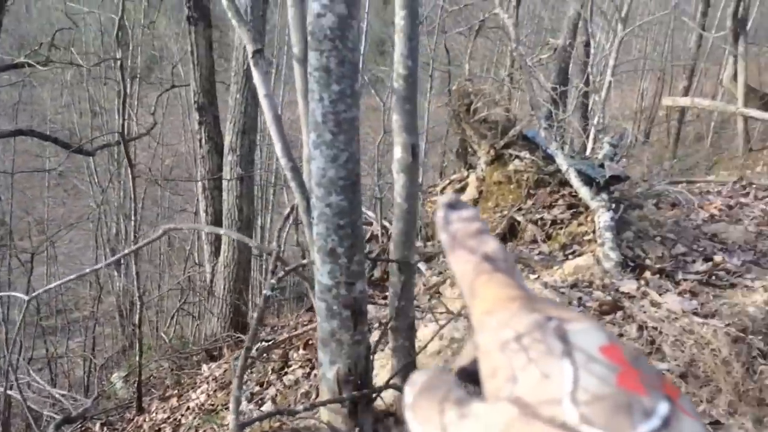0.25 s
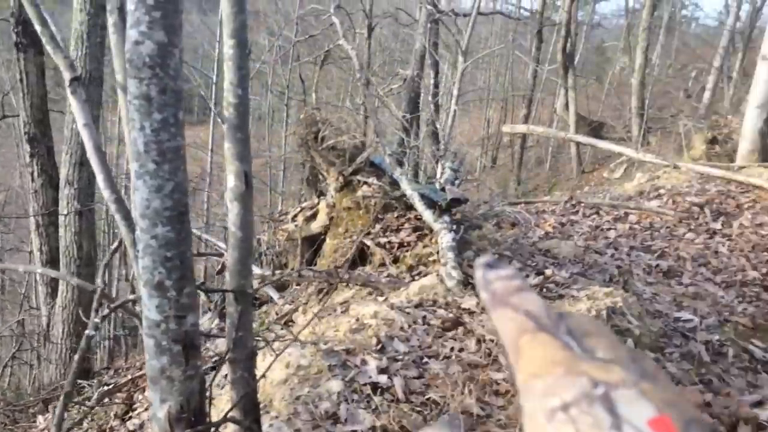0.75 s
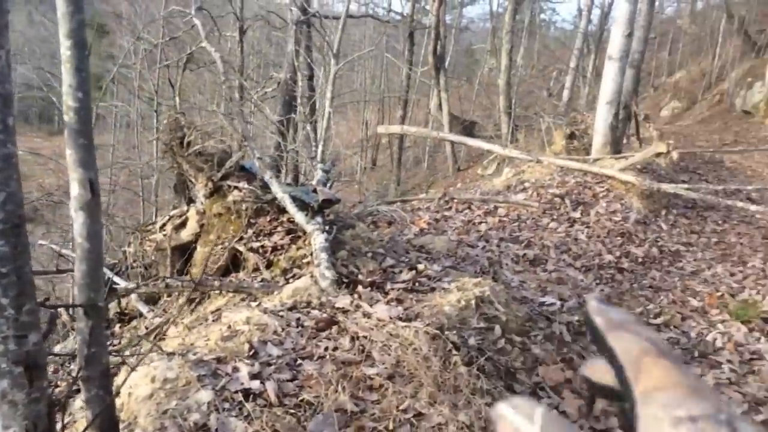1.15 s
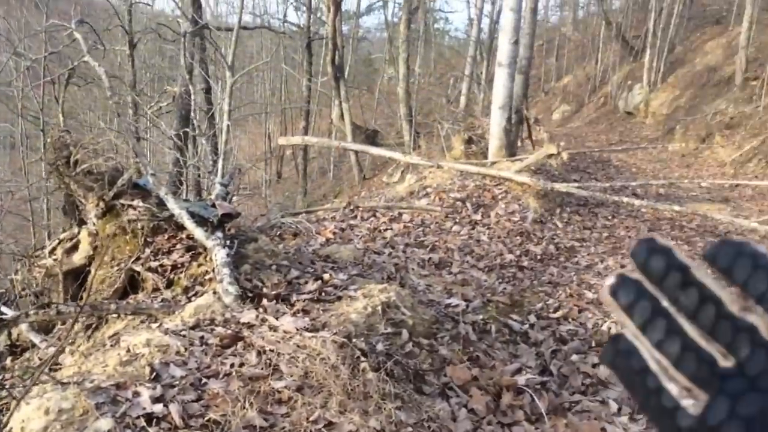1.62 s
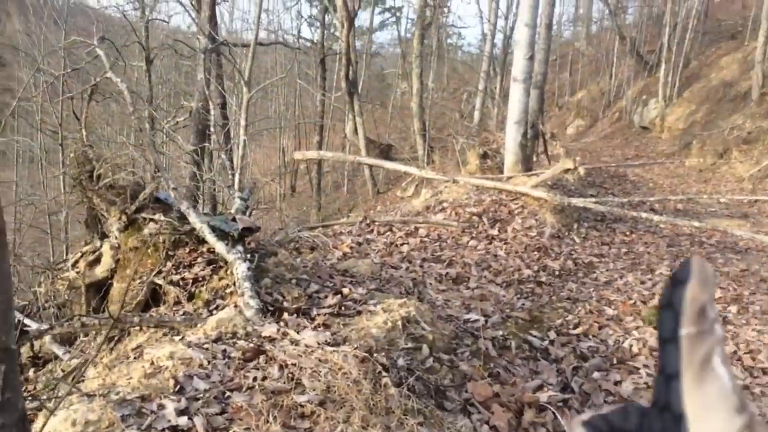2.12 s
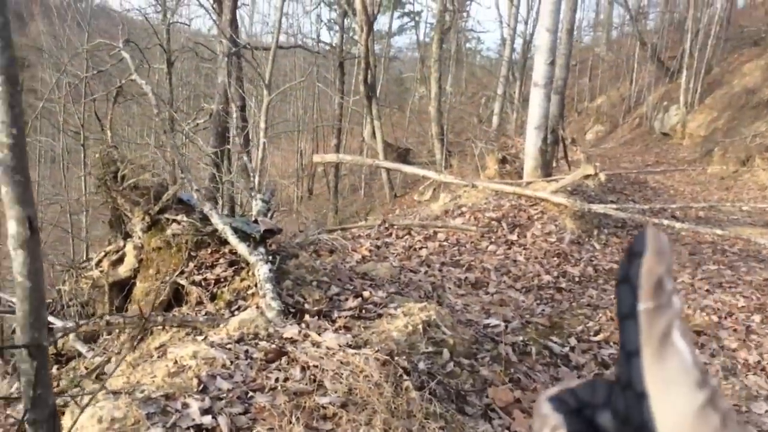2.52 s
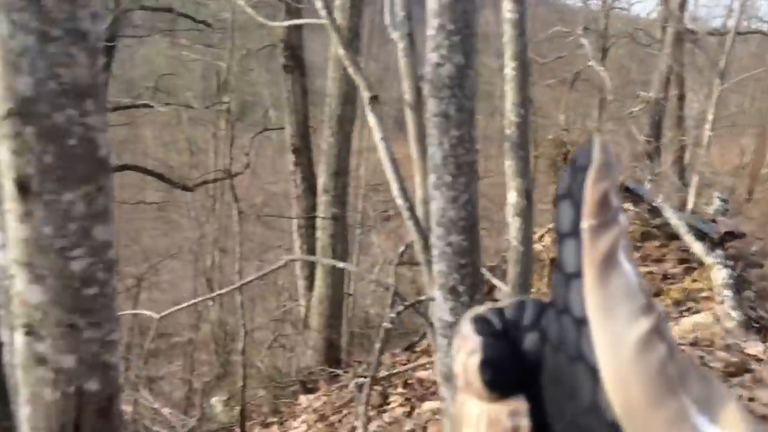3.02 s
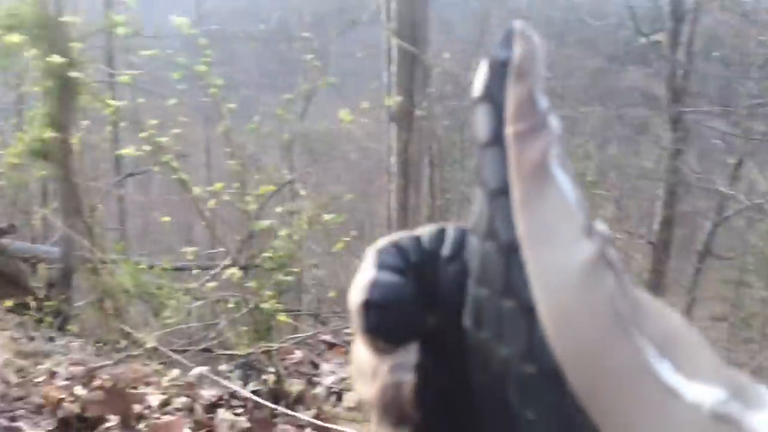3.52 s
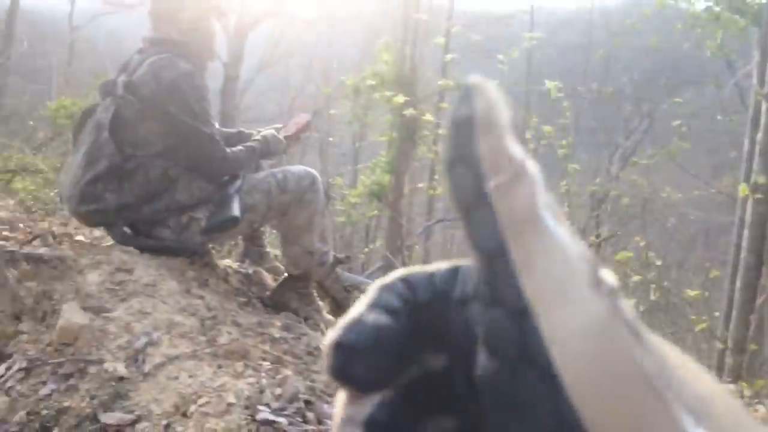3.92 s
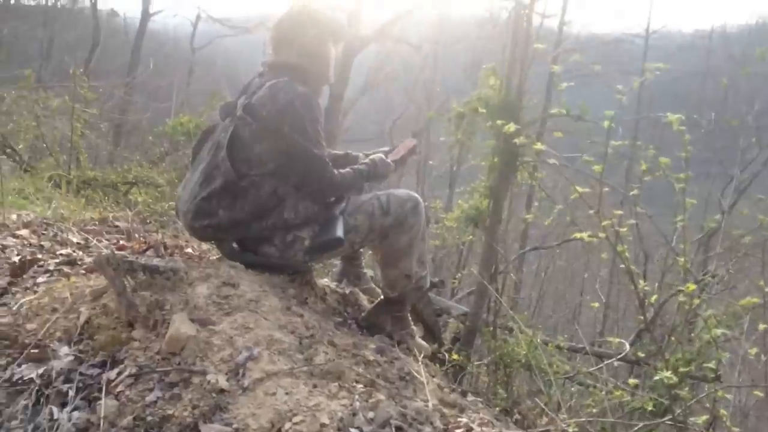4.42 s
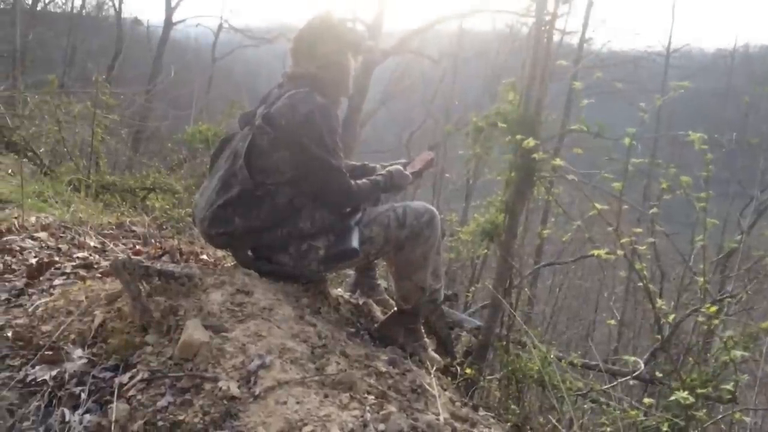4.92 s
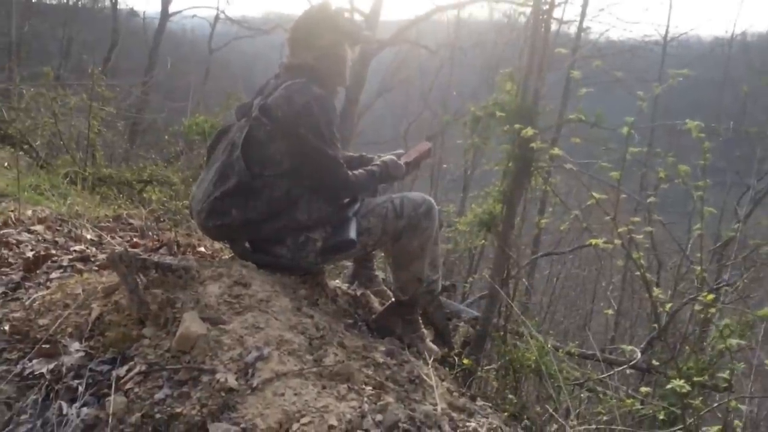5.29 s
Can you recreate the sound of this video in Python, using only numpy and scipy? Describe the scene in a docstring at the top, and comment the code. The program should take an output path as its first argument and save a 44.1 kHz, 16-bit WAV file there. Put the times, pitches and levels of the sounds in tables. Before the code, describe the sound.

A wooden box call scrapes softly, then gives loud, evenly spaced hen-turkey yelps echoing in the woods, with leaf snaps and a faint distant woodpecker.

```python
"""A wooden box call: the lid scrapes softly, then sticks and slips on the lip in a run of hen-turkey yelps.
Slip pulses and chalk noise ring the box and its walls; noise echoes stand for the trunks that answer.
A far woodpecker drums on a dead trunk under the first yelps; a thin far whistle opens the scene.
Close by, noise bursts make snapping leaves and rustling clothes; low noise makes air on the microphone."""
import sys
import numpy as np
from scipy import signal
from scipy.fft import rfft, irfft, next_fast_len
from scipy.io import wavfile
from scipy.ndimage import uniform_filter1d, map_coordinates

SR = 44100
rng = np.random.default_rng(int(sys.argv[2]) if len(sys.argv) > 2 else 0)


def dump(signal):
    """Clip the signal to [-1, 1] and save it as 16-bit WAV at the path in sys.argv[1]."""
    limited = np.clip(np.atleast_2d(signal).T, -1, 1)
    pcm = np.round(limited * 32767).astype(np.int16)
    wavfile.write(sys.argv[1], SR, pcm)


N = 244755


def amp(db):
    """Decibels to gain."""
    return 10 ** (np.asarray(db) / 20)


def unit(x):
    """x at rms 1."""
    return x / np.sqrt(np.mean(x ** 2) + 1e-20)


def along(points, hz):
    """(frequency [Hz], value) points read on a log-frequency axis."""
    point_hz, values = np.transpose(points)
    return np.interp(np.log(hz + 1), np.log(point_hz + 1), values)


def curve(rows):
    """One value per sample from (time [s], value) rows."""
    return np.interp(np.arange(N) / SR, *np.transpose(rows))


def wobble(rate_hz, size):
    """Smooth random curve through rate_hz random knots a second."""
    knots = rng.standard_normal(int(size * rate_hz / SR) + 6)
    return map_coordinates(knots, [2 + np.arange(size) * rate_hz / SR])


def filtered(x, response):
    """x times a response of frequency."""
    m = next_fast_len(len(x) + 8192)
    return irfft(rfft(x, m) * response(np.fft.rfftfreq(m, 1 / SR)), m)[:len(x)]


def coloured(x, points):
    """x through a (frequency [Hz], level [dB]) spectrum."""
    return filtered(x, lambda hz: amp(along(points, hz)))


def resonate(x, modes):
    """x through parallel (frequency [Hz], width [Hz], level [dB]) resonances of alternating sign."""
    def response(f):
        total = 0
        for k, (centre, width, db) in enumerate(modes):
            damping = 1j * f * width
            total = total + (-1) ** k * amp(db) * damping / (centre * centre - f * f + damping)
        return total
    return filtered(x, response)


def steady(x, size=160):
    """x held near rms 1 over a few milliseconds."""
    power = uniform_filter1d(uniform_filter1d(x * x, size), size)
    return x / np.sqrt(np.abs(power) + 1e-12)


def add(track, start_s, x):
    """Mix x into the track from start_s on."""
    part = track[max(round(start_s * SR), 0):][:len(x)]
    part += x[:len(part)]


# far hush spectrum: (frequency [Hz], level [dB])
FOREST = [(30, -23.5), (130, 0), (300, 3), (550, -1.5), (1000, -4), (2500, -10), (8000, -43), (16000, -20)]
# far hush, before hush_db: (time [s], level [dB])
HUSH_LEVEL = [(0.0, -69), (2.5, -60.5), (5.55, -68)]
# air rumble spectrum: (frequency [Hz], level [dB])
RUMBLE = [(15, -19), (35, -2), (62, 5), (100, 0.5), (170, -13.5), (400, -87)]
# puffs of air: (time [s], length [s], level [dB])
PUFFS = [(1.047, 0.0065, -47), (1.271, 0.0095, -47.5), (1.83, 0.039, -50), (1.905, 0.03, -45),
         (2.087, 0.048, -55.5), (2.31, 0.044, -59), (3.13, 0.039, -47), (3.244, 0.018, -41.5),
         (3.968, 0.015, -47.5), (4.353, 0.12, -58.5), (4.622, .018, -37), (4.699, 0.019, -42),
         (4.811, 0.039, -51), (5.28, 0.059, -53.5)]
BREEZE_DB = -66  # steady air on the microphone


def air(hush_db=1, lumps_db=3):
    """Lumpy low noise, pushed up in Gaussian puffs, over the far hush of the wood."""
    t = np.arange(N) / SR
    push = amp(BREEZE_DB) + sum(amp(db) * np.exp(-((t - s) / length) ** 2) for s, length, db in PUFFS)
    lumps = amp(lumps_db * wobble(20, N))
    rumble = unit(coloured(rng.standard_normal(N), RUMBLE) * lumps)
    hush = unit(coloured(rng.standard_normal(N), FOREST))
    return push * rumble + amp(curve(HUSH_LEVEL) + hush_db) * hush


def far_bird(pitch_hz=2760, level_db=-72.5, notes_hz=5.1):
    """Thin far whistle: four notes of a sine with wavering pitch and fluttering level."""
    t = np.arange(N) / SR
    phase = 2 * np.pi * np.cumsum(pitch_hz * (1 + .018 * wobble(400, N))) / SR
    notes = np.abs(np.sin(np.pi * notes_hz * t)) * (t < 4 / notes_hz)
    flutter = amp(3 * wobble(40, N))
    return notes * amp(level_db) * unit(np.sin(phase) * flutter)


# drum roll loudness: (time [s], peak level [dB])
DRUM_LEVEL = [(1.33, -41.5), (1.8, -44.5), (2.2, -47), (2.75, -50.5)]
# dead trunk resonances: (frequency [Hz], width [Hz], level [dB])
TRUNK = [(668, 42, 6), (1140, 220, -7.5), (1490, 250, -9)]


def woodpecker(t60_s=0.077, scatter=0.18, count=22):
    """A roll of blows that speeds up and fades; each rings a dead trunk, and the trees on the way smear it."""
    out, t, k = np.zeros(N), np.arange(4096) / SR, np.arange(count)
    for s in 1.3305 + .0746 * k - .000364 * k ** 2:
        smear = scatter * rng.standard_normal(len(t)) * amp(-60 * t / t60_s)
        knock = resonate((t == 0) + smear, TRUNK)
        peak_db = np.interp(s, *np.transpose(DRUM_LEVEL))
        add(out, s, amp(peak_db) * knock / np.abs(knock).max())
    return out


# decay of the deep wood's echoes: (frequency [Hz], T60 [s])
WOOD_T60 = [(300, 0.86), (1400, 1), (3000, 1), (7000, 0.92), (14000, 0.2)]
# what the trees throw back: (frequency [Hz], level [dB])
ECHO = [(600, 3), (1350, 4), (2100, -0.5), (2800, 3), (4500, -0.5), (7300, 6.5), (12000, -10)]


def woodland(x, near_db=-23, near_t60_s=0.19, far_db=-30, trunks=0.0015):
    """Ground and near trunks answer at once; the deeper wood answers in faint, scattered echoes."""
    echoes = rng.standard_normal(SR) * (rng.random(SR) < trunks) * amp(0.98 * wobble(34.8, SR))
    hz, t, z = signal.stft(echoes, SR, nperseg=256)
    decay = amp(-60 * t / along(WOOD_T60, hz)[:, None])
    far = signal.istft(z * decay, SR, nperseg=256)[1][:SR]
    age = np.arange(SR) / SR
    near = rng.standard_normal(SR) * amp(-60 * age / near_t60_s) * (age > .003)
    answer = amp(near_db) * near / np.linalg.norm(near) + amp(far_db) * far / np.linalg.norm(far)
    return coloured(signal.fftconvolve(x, answer)[:N], ECHO)


# rustling, before the part levels: (time [s], level [dB])
RUSTLE_LEVEL = [(0, -61), (.5, -68.5), (1.35, -62), (2.15, -70.5), (2.7, -64), (3.45, -66.5), (3.7, -54),
                (4.05, -65.5), (5.55, -66.5)]
# cloth and leaf spectrum: (frequency [Hz], level [dB])
LEAVES = [(300, -13), (1000, -4.5), (2500, -1), (5000, -5), (9000, -9.5), (16000, -11)]


def rustle(brush_db=-3, grain_db=-3, grain_rate_hz=130, spread_db=4.0):
    """Cloth brushes softly as lumpy noise; tiny leaf crackles, low, middle and high, sit on top."""
    grains = np.zeros(N)
    decay = amp(-60 * np.arange(512) / SR / 0.014)
    for band_hz in ((800, 4000), (3000, 8000), (6000, 16000)):
        hits = rng.random(N) < grain_rate_hz / SR
        sizes = hits * amp(spread_db * np.minimum(rng.exponential(size=N), 4))
        bursts = signal.fftconvolve(sizes, decay)[:N]
        b, a = signal.butter(2, band_hz, "band", fs=SR)
        grains += signal.lfilter(b, a, bursts * rng.standard_normal(N))
    brush = rng.standard_normal(N) * amp(3.4 * wobble(25.58, N))
    brush = amp(brush_db) * unit(coloured(brush, LEAVES))
    grains = amp(grain_db) * unit(coloured(grains, LEAVES))
    return amp(curve(RUSTLE_LEVEL)) * (brush + grains)


# leaf and gear snaps, before part levels: (time [s], level [dB], low part re level [dB])
SNAPS = [(0.1101, -48.5, 5), (0.5943, -46.5, -20), (0.7427, -52, 6), (0.779, -47, 3), (0.802, -36, -19),
         (1.062, -50.5, 6), (1.11, -47, 2.5), (1.1481, -40.5, -3), (1.296, -44, 13), (1.3132, -39, -11),
         (1.409, -51.5, 19), (2.4945, -50, -17), (2.7402, -44.5, 1), (2.7788, -48, 7.5),
         (3.8796, -42.5, -1), (4.1644, -43.5, -8), (4.254, -44.5, -5), (4.5173, -29.5, -8),
         (5.0958, -39.5, 0), (5.4264, -49, 6.5)]
# bright part of a snap: (frequency [Hz], level [dB])
CRISP = [(1500, -5.5), (3200, 1), (6200, 7.5), (10000, -2), (13500, -3), (16000, 2.5)]
# low part of a snap: (frequency [Hz], level [dB])
DULL = [(150, -5), (500, -2.5), (1300, -0.5), (3000, 3.5), (5000, -22)]
TICK_DB, TICK_SPREAD_DB, TICK_LOW_DB = -54.5, 10.5, 3.5  # chance snaps; levels as in SNAPS, +/- spread


def snaps(crisp_db=4.5, dull_db=-2, after_db=-24, after_t60_s=0.04, count=6):
    """A dry noise crack, its bounce off the ground and a crumbling tail; more fall at chance moments."""
    out, t = np.zeros(N), np.arange(2048) / SR
    bounce = .4 * (t > .0035) * amp(-60 * np.abs(t - .0035) / .009)
    envelope = amp(-60 * t / .008) + bounce + amp(after_db - 60 * t / after_t60_s)
    ticks = [(when * N / SR, TICK_DB + TICK_SPREAD_DB * (2 * size - 1), TICK_LOW_DB)
             for when, size in rng.random((count, 2))]
    for s, db, low_db in list(SNAPS) + ticks:
        crack = rng.standard_normal(len(t)) * envelope
        crisp, dull = coloured(crack, CRISP), coloured(crack, DULL)
        crisp = amp(crisp_db) * crisp / np.abs(crisp).max()
        dull = amp(low_db + dull_db) * dull / np.abs(dull).max()
        add(out, s, amp(db) * (crisp + dull))
    return out


# upper resonances of the thin walls: (frequency [Hz], width [Hz], level [dB])
WALLS = [(2760, 560, 6), (3480, 370, 5), (3700, 630, -13), (4884, 740, -6), (5723, 370, -3.5),
         (7260, 840, -9.5), (9200, 970, -18), (12200, 4900, -27)]


def walls(x, low_hz=2350):
    """x through the walls' resonances, which radiate nothing low."""
    def response(f):
        peaks = sum(amp(db) / (1 + (2 * (f - hz) / width) ** 2) for hz, width, db in WALLS)
        return peaks / (1 + (low_hz / (f + 1)) ** 20)
    return filtered(x, response)


# low resonances of the box: (frequency [Hz], width [Hz], level [dB])
BOX = [(1489, 252, 0.5), (1983, 232, 0.33)]
# pass band of the body tone: (frequency [Hz], level [dB])
BODY = [(300, -75), (690, -10), (1080, 1), (1300, 7), (1680, -7.5), (1900, -4.5), (2200, 0), (2420, 8),
        (2800, -70)]
ATTACK_S, RELEASE_DB_PER_S = 0.006, 1497
TREBLE_HZ = 6060  # the rasp's treble shelf is complete here, from an octave below


def stroke(age, length_s, rate_hz, body_db, rasp_db, rough, treble_db, jitter=0.038, waver=0.033,
           size_db=3, body_grit=0.13, rasp_grit=0.96, least_rough=0.11, uneven_db=4.5, smear=0.085):
    """The chalked lid sticks and slips on the lip; each slip kicks the box, unevenly where the grip is poor."""
    n, rough = len(age), np.hypot(np.clip(rough, 0, 1), least_rough)
    # rate wanders with the wood grain and jumps from slip to slip
    rate_hz = rate_hz * (1 + rough * (waver * wobble(170, n) + jitter * wobble(700, n)))
    phase = 2 * np.pi * np.cumsum(rate_hz) / SR
    orders = np.arange(1, 25)
    size = amp(size_db * rough * wobble(500, n))
    slips = unit(np.cos(np.outer(orders, phase)).sum(0)) * size
    # chalk grinds while the lid slides, once a cycle
    grind = rough * unit((1 + np.cos(phase)) * rng.standard_normal(n))
    # poor grip: grinding takes over, the note turns hoarse
    hoarse = body_grit + 1.8 * rough ** 2
    body = steady(coloured(resonate(slips + hoarse * grind, BOX), BODY))
    # walls spread each slip in time; as the contact travels, each overtone wavers and frays on its own
    overtones = np.zeros(n)
    for k, lag in zip(orders, 2 * np.pi * rng.random(len(orders))):
        level = amp(uneven_db * wobble(55, n))
        overtones += level * np.cos(k * (phase + smear * wobble(260, n)) + lag)
    rasp = steady(walls(unit(overtones) * size + rasp_grit * grind))
    rasp = coloured(rasp, [(TREBLE_HZ / 2, 0), (TREBLE_HZ, treble_db)])
    release_db = -RELEASE_DB_PER_S * np.maximum(age - length_s, 0)
    gate = np.clip(age / ATTACK_S, 0, 1) * amp(release_db)
    return gate * (amp(body_db) * body + amp(rasp_db) * rasp)


SWELL_DB, SCRAPE_SAG_DB_PER_S, SCRAPE_GLIDE_HZ_PER_S = 19, 55, 540
SCRAPE_RASP_DB, SCRAPE_TREBLE_DB = -16.5, -0.5  # rasp re body; shelf on the rasp
LOOSE_ROUGH = 0.21  # extra roughness before the swell is complete


def scrape(length_s, swell_s, pitch_hz, body_db, rough):
    """The lid slides with little weight on it: a hoarse note that swells, glides up and sags."""
    age = np.arange(round(.27 * SR)) / SR
    loose = np.maximum(1 - age / swell_s, 0)
    level_db = body_db - SWELL_DB * loose - SCRAPE_SAG_DB_PER_S * np.maximum(age - swell_s, 0)
    rate_hz = pitch_hz + SCRAPE_GLIDE_HZ_PER_S * (age - swell_s)
    return stroke(age, length_s, rate_hz, level_db, level_db + SCRAPE_RASP_DB,
                  rough + LOOSE_ROUGH * loose, SCRAPE_TREBLE_DB)


BITE_S, BITE_HZ, BITE_ROUGH = 0.00585, 55.6, 0.85  # the lid first bites sharp and gritty
BREAK_S, BREAK_LIFT_DB, BREAK_ROUGH = 0.0033, 1, 0.34  # the note cracks down to its low register
RISE_POWER, FADE_POWER = 1.482, 4.4  # higher: pitch rise and fade come later
EASE_ROUGH, RASP_FADE_SHARE = 0.48, 0.33  # a light lid chatters; its rasp outlasts the body tone
LIFT_S, LIFT_HZ = 0.0069, 30  # the pitch flicks up as the lid lifts off
HIGH_DB, SETTLE_S = -4, 0.015  # body tone is softer until the low register has settled
ACCENT_S = 0.013  # width of the opening accent


def yelp(length_s, pitch_hz, break_s, drop_hz, rise_hz, body_db, accent_db, fade_db,
         rasp_db, treble_db, rough):
    """The lid bites on a high note, breaks to a low one, then bends and fades as the hand eases off."""
    age = np.arange(round(.15 * SR)) / SR
    bite = np.exp(-age / BITE_S)
    lift = np.exp(np.minimum(age - length_s, 0) / LIFT_S)
    past_break = (age - break_s) / BREAK_S
    high, crack = (1 - np.tanh(past_break)) / 2, np.exp(-past_break ** 2)
    unsettled = np.exp(-np.maximum(age - break_s, 0) / SETTLE_S)
    ease = np.clip((age - break_s) / (length_s - break_s), 0, 1)
    rate_hz = pitch_hz + BITE_HZ * bite + drop_hz * high + rise_hz * ease ** RISE_POWER + LIFT_HZ * lift
    opening_db = accent_db * np.exp(-(age / ACCENT_S) ** 2)
    slack = np.minimum(age / length_s, 1) ** FADE_POWER
    body_db = body_db + opening_db + HIGH_DB * unsettled - fade_db * slack + BREAK_LIFT_DB * crack
    rasp_db = rasp_db + opening_db / 2 - RASP_FADE_SHARE * fade_db * slack
    rough = rough + BITE_ROUGH * bite + BREAK_ROUGH * crack + EASE_ROUGH * slack
    return stroke(age, length_s, rate_hz, body_db, rasp_db, rough, treble_db)


# light scrapes: (time [s], length [s], swell time [s], pitch at the peak [Hz], body level [dB],
#   roughness [0-1])
SCRAPES = [(1.542, .105, 0.074, 650, -49, 0.62), (1.711, 0.21, .118, 693.5, -29, 0.34),
           (3.12, 0.1, 0.047, 739, -35.5, 0.7)]
# yelps: (time [s], length [s], low pitch [Hz], break after [s], drop at the break [Hz],
#   closing rise, negative falls [Hz], body level [dB], opening accent [dB], closing fade [dB],
#   rasp level [dB], rasp treble [dB], roughness [0-1])
YELPS = [ (1.926, 0.078, 685.6, 0.01, 41.2, 1, -19.5, -0.5, 15, -36.5, -2.5, 0),
         (2.259, 0.096, 677, 0.029, 30, 32, -14.5, -5.5, 22.5, -32, 1.5, 0.01),
         (2.561, 0.061, 668.7, 0.0045, 22, 44, -14.5, -0.5, 19.5, -31.5, 0, .06),
         (2.846, 0.089, 692.2, 0.055, 26.5, -38.5, -18, -4, 24.5, -42.5, 3.5, 0.28),
         (3.174, .040, 648, 0.015, 89, 49, -15.5, 0.5, 12, -34.5, 5, .22),
         (3.413, 0.098, 692.3, 0.035, 57.9, 16.5, -13.5, -4, 8.5, -33.5, 1.5, 0.04),
         (3.739, 0.091, 708, 0.0072, 28.5, 28, -18, 4.5, 5.5, -33.5, 3.5, 0),
         (4.028, 0.094, 674.5, .012, 46, 43.5, -15.5, 4, 5.5, -32, 0, 0),
         (4.326, 0.097, 668.4, 0.0091, 49, 29.5, -15.5, 0, 6, -31, -0.5, 0),
         (4.611, 0.085, 642.3, 0.043, 24.1, 72, -12, 1, 13, -29.5, -1.5, 0.24),
         (4.896, 0.079, 640.7, .029, 24.2, 71, -12.5, 2.5, 17, -30, 1, 0.26),
         (5.173, .084, 617.8, .025, 49.8, 70, -11.5, -0.5, 25, -30, -1.5, 0.15),
         (5.452, .077, 611, 0.015, 43.1, 81, -12, -1, 25, -32, 2, 0.2)]


def box_call():
    """All strokes of the lid: light slides and full stick-slip yelps."""
    out = np.zeros(N)
    for s, *row in YELPS:
        add(out, s, yelp(*row))
    for s, *row in SCRAPES:
        add(out, s, scrape(*row))
    return out


def turned(x, behind_db=-11, edge_hz=5600):
    """The caller's highest rasp is shaded until the microphone swings round to face him."""
    away = curve([(3.2, 1), (3.7, 0)])
    shaded = coloured(x, [(edge_hz / 2, 0), (edge_hz * 2, behind_db)])
    return away * shaded + (1 - away) * x


def scene(drum_wet_db=9):
    """Call and drumming echo among the trees; the whistle, small noises and air stay dry."""
    call, drumming = turned(box_call()), woodpecker()
    echoes = woodland(call + amp(drum_wet_db) * drumming)
    mix = call + drumming + echoes + far_bird() + snaps() + rustle() + air()
    return mix[None]


TOP_HZ = 15700


def record(dry):
    """Band limit: nothing passes from TOP_HZ up."""
    return np.array([filtered(x, lambda hz: hz < TOP_HZ) for x in dry])


dry = scene()
out = record(dry)
dump(out)
```